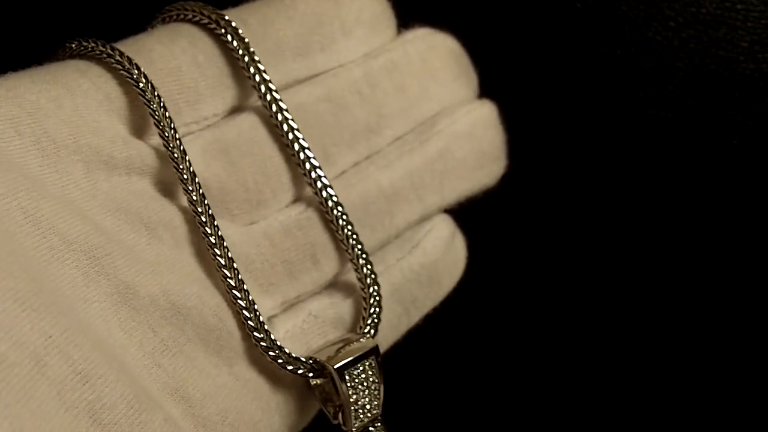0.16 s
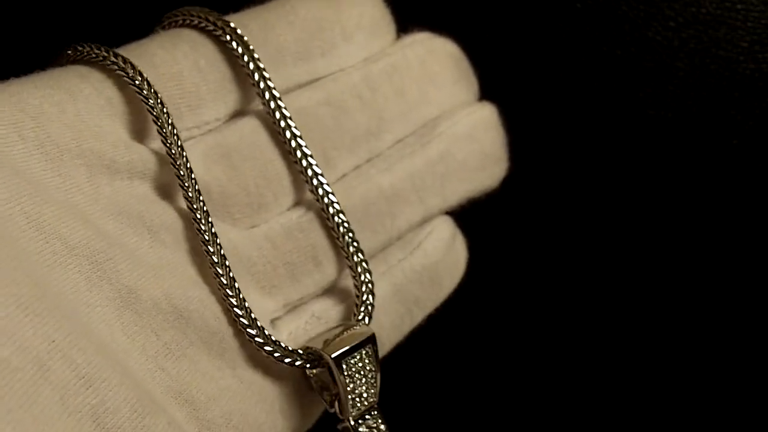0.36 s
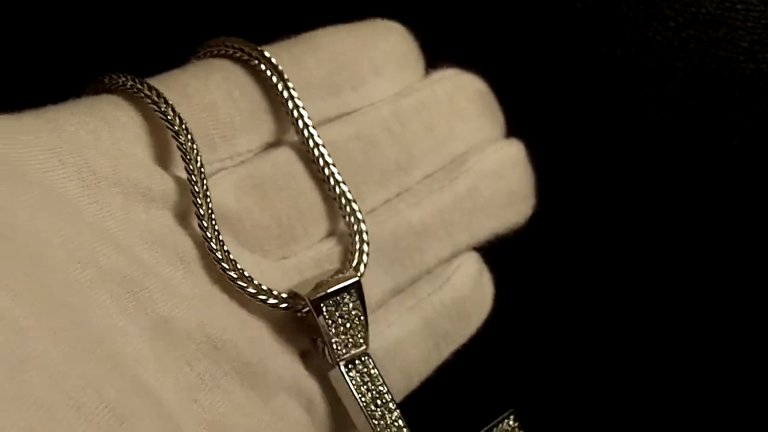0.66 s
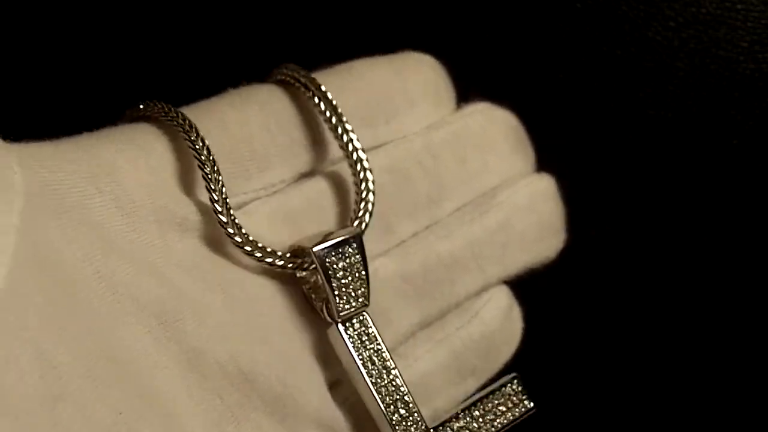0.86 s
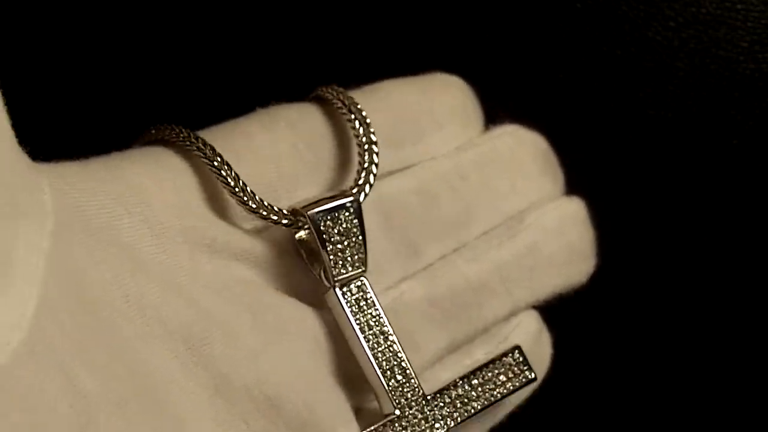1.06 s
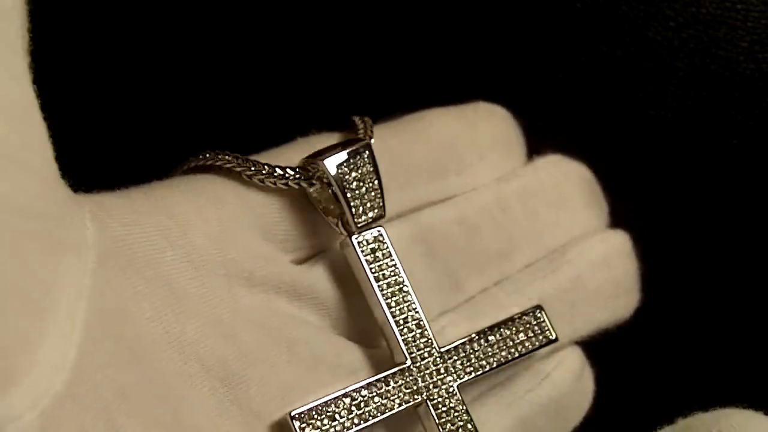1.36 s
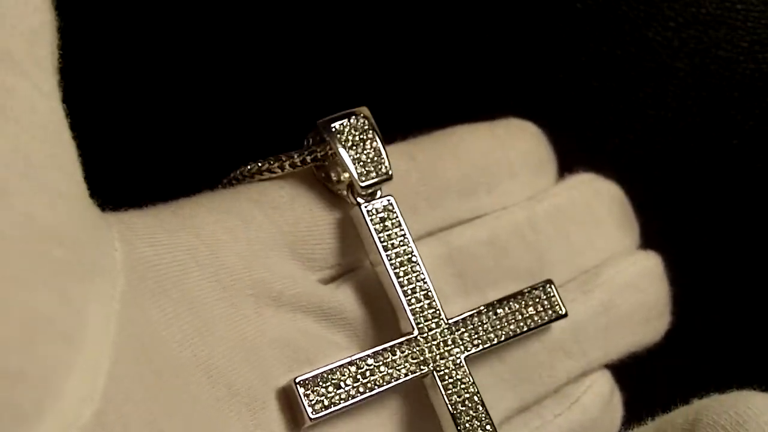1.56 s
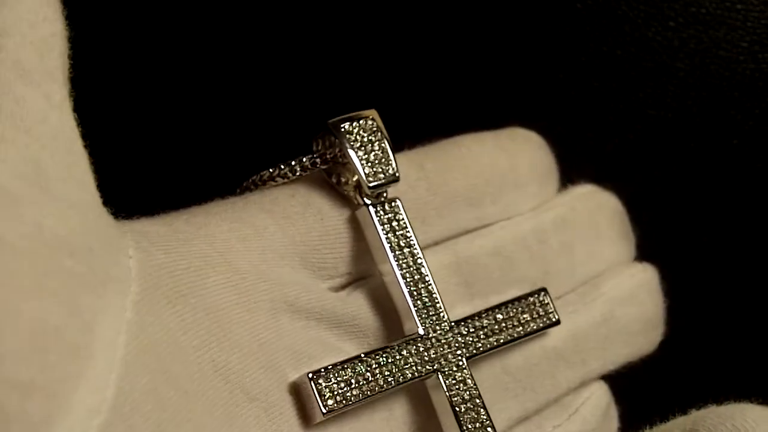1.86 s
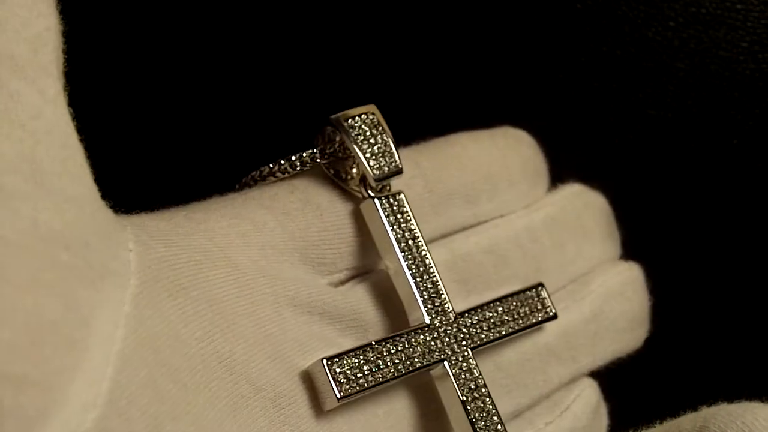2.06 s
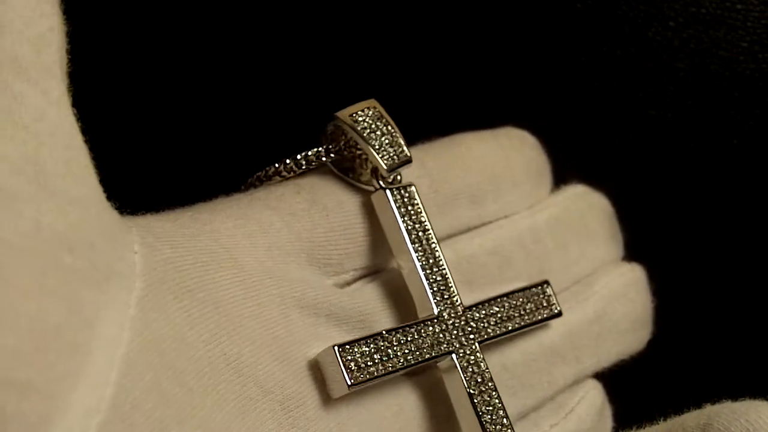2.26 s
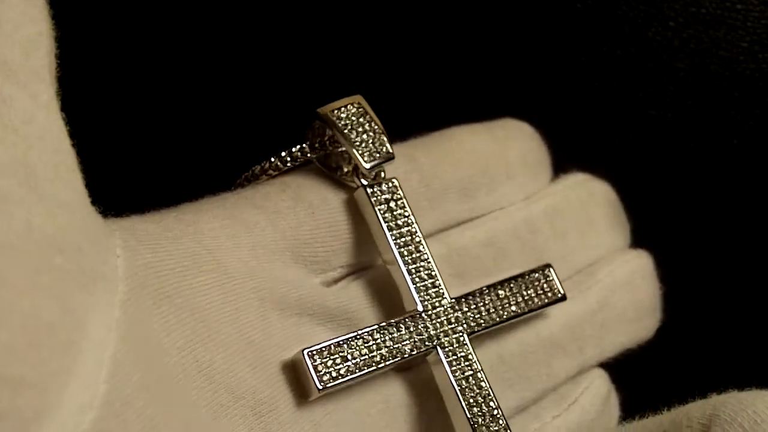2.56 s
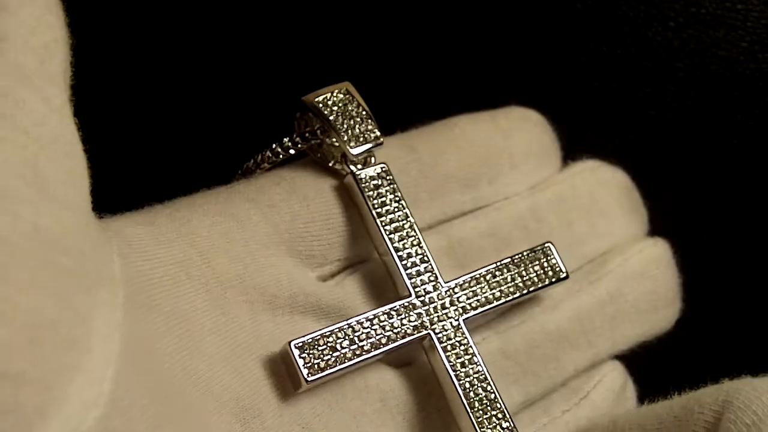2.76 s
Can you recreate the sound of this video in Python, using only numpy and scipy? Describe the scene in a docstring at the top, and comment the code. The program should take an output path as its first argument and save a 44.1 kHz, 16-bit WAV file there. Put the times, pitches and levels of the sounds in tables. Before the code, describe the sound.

Close up, a necklace chain slides through its pendant with a short, delicate metallic jingle. Faint ticks come before and after it, then a last light click, over the low hum and soft hiss of a quiet room.

```python
"""A quiet room with a low hum and a faint pulsing electronic whine; then light touches of metal, up close.
A gloved hand tilts a metal pendant close to the microphone, and its chain slips through the pendant's loop.
Each contact is a cluster of tiny impacts that ring the links and the pendant.
The pendant settles with one last click, and the room tone carries on."""
import sys
import numpy as np
from scipy import signal
from scipy.fft import rfft, irfft
from scipy.io import wavfile
from scipy.ndimage import uniform_filter1d

SR = 44100
rng = np.random.default_rng(int(sys.argv[2]) if len(sys.argv) > 2 else 0)


def transcribe(signal):
    """Save signal, clipped to [-1, 1], as a 16-bit WAV file at the path in sys.argv[1]."""
    frames = np.atleast_2d(signal).T
    limited = np.clip(frames, -1, 1)
    pcm = np.round(limited * 32767).astype(np.int16)
    wavfile.write(sys.argv[1], SR, pcm)


N = 128331
IMPACTS_PER_S = 3200

# colour of a bare impact: f/Hz, level/dB
TICK_COLOUR = [(500, -34), (1200, -23), (1900, -10), (2480, 10.5), (2950, -11), (3700, -20), (4320, 11),
               (5300, -22.5), (6400, 9.5), (8300, 0.5), (9400, -6), (10500, 3), (11300, -19), (15000, -28)]
# modes of the chain's links: f/Hz, level/dB, t60/s
LINK_MODES = [(2420, -16, .01), (2590, -14, .014), (4290, -7, .03), (4520, -14, .015), (6080, -10, .02),
              (6290, -3, .03), (6372, 1, .05), (6530, -3, .025), (6800, -4, .016), (7220, -7, .016),
              (7560, -10, .025), (7850, -7, .016), (8450, -8, .016), (10250, -7, .018), (10670, -6, .03)]
# the pendant's two long rings: f/Hz, level/dB, t60/s
LONG_RINGS = [(7550, 0, .11), (8295, -4, .08)]


def undb(db):
    """Decibels to gain."""
    return 10 ** (np.asarray(db) / 20)


def unit(x):
    """Scale to an rms of 1."""
    return x / np.sqrt(np.mean(x ** 2))


def curve(points, hz):
    """Gain of (f/Hz, level/dB) points on a log-frequency axis."""
    point_hz, point_db = np.array(points, float).T
    return undb(np.interp(np.log(np.maximum(hz, 1)), np.log(point_hz), point_db))


def wander(rate_hz):
    """Smooth random wander with an rms of 1."""
    hold = int(SR / rate_hz)
    steps = np.repeat(rng.standard_normal(N // hold + 1), hold)
    return unit(uniform_filter1d(uniform_filter1d(steps, hold), hold)[:N])


def coloured(x, points, size=512):
    """Pass x through a minimum-phase filter shaped by (f/Hz, level/dB) points."""
    cepstrum = irfft(np.log(curve(points, np.arange(size // 2 + 1) * SR / size)))
    cepstrum[1:size // 2] *= 2
    cepstrum[size // 2 + 1:] = 0
    return signal.fftconvolve(x, irfft(np.exp(rfft(cepstrum))))[:len(x)]


def add(out, start, y):
    """Mix a sound in at its time."""
    i = int(start * SR)
    out[i:i + len(y)] += y[:N - i]


def room_tone(level_db=-43):
    """Steady room rumble and microphone hiss, nearly centred in the bass."""
    # spectrum of rumble and hiss: f/Hz, relative density/dB
    spectrum = [(5, 4.5), (12, 1), (20, 3), (30, 0), (43, -14.5), (80, -14.5), (135, -15.5), (200, -22.5),
                (300, -26.5), (500, -32.5), (900, -38.5), (1600, -44.5), (2800, -49.5), (4700, -55),
                (6500, -55), (7900, -51.5), (9500, -54), (12400, -53.5), (13200, -63), (15000, -61.5)]
    # stereo width: f/Hz, side against mid/dB
    width = [(50, -40), (300, -46.5), (600, -35.5), (1000, -14), (2500, -8.5), (5500, -17), (7500, -12),
             (12000, -4), (14000, -14)]
    hz = np.arange(N // 2 + 1) * SR / N
    mid, side = rfft(rng.standard_normal((2, N))) * unit(curve(spectrum, hz))
    mid, side = irfft(mid, N), irfft(side * curve(width, hz), N)
    return np.array([mid + side, mid - side]) * undb(level_db)


def hum(pitch_hz=58.3, drift=.015, level_db=-46, waver_db=2):
    """The room's low drone: a gently wavering hum, and noise held in a few narrow resonances."""
    # low resonances of the drone: f/Hz, half-width/Hz, level/dB
    resonances = [(61.1, 3.5, -50), (108.7, 5.7, -58), (164.7, 9.3, -64), (236.4, 8.8, -66)]
    cycles = np.cumsum(pitch_hz * (1 + drift * wander(rate_hz=8.87))) / SR + rng.random()
    drone = np.sqrt(2) * np.sin(2 * np.pi * cycles) * undb(level_db + waver_db * wander(rate_hz=8.02))
    hz = np.arange(N // 2 + 1) * SR / N
    for centre, width, db in resonances:
        band = rfft(rng.standard_normal(N)) / (1 + ((hz - centre) / width) ** 2)
        drone += undb(db) * unit(irfft(band, N))
    return drone


def whine(rate_hz=29.97, duty=.48, pulse_centre_s=.0018):
    """Thin electronic tones switch on and off at a steady rate, starting afresh in every cycle."""
    # tones of the whine: f/Hz, level while on/dB
    partials = [(2428, -83), (3062, -78.5), (6125, -78), (6260, -94), (6560, -87), (7850, -86)]
    phase = (rate_hz * (np.arange(N) / SR - pulse_centre_s) + duty / 2) % 1
    tones = sum(np.sin(2 * np.pi * hz * phase / rate_hz) * undb(db) for hz, db in partials)
    return np.sqrt(2) * tones * (phase < duty)


def ring(modes, push, t, detune=.0008, scatter_db=1.5):
    """Metal modes driven by a push; each contact excites them a little differently."""
    out = 0
    for hz, db, t60 in modes:
        pitch_draw, level_draw = rng.standard_normal(2)
        mode = np.sin(2 * np.pi * hz * (1 + detune * pitch_draw) * t) * np.exp(-np.log(1000) * t / t60)
        driven = signal.fftconvolve(push, mode)[:len(t)]
        out = out + unit(driven) * np.sqrt(t60) * undb(db + scatter_db * level_draw)
    return unit(out)


def contact(bodies, length, low_db, top_db, tick_db, size=8192):
    """Tiny impacts in quick succession tick and ring the bodies, given as (modes, dB), then die away."""
    settle_db, settle_s, scatter_db = -13, .004, 3
    t = np.arange(size) / SR
    hits = rng.random(size) < IMPACTS_PER_S / SR
    hits[0] = True
    force = np.where(t <= length, 1, undb(settle_db) * np.exp(-np.abs(t - length) / settle_s))
    push = hits * force * undb(scatter_db * rng.standard_normal(size)) * rng.choice([-1, 1], size)
    tick = unit(coloured(push, TICK_COLOUR))
    metal = unit(sum(undb(db) * ring(modes, push, t) for modes, db in bodies))
    shelves = [(4800, low_db), (6000, 0), (8400, 0), (10200, top_db)]
    sound = coloured(metal + undb(tick_db) * tick, shelves)
    power = uniform_filter1d(sound ** 2, size=176, mode="constant")
    return sound / np.sqrt(power.max())  # rms 1 over the loudest 4 ms


def light_touches(out, link_t60=.0035):
    """Links stir against the pendant before and after the slip."""
    # touches: t/s, level/dB, length/s, struck link f/Hz, long rings/dB, low shelf/dB
    touches = [(.1745, -61, .0012, 7600, -4, 8), (0.3357, -59, 0.0036, 3500, -7, 4),
               (.3915, -67, 0.0034, 7700, -5, 2), (0.504, -60.5, 0.0028, 8200, 5, 0.5),
               (0.511, -64, 0.0067, 6700, -7, 5), (0.577, -62, 0.0053, 8350, -1, 5),
               (0.591, -61.5, .0035, 8000, 0, 5), (1.074, -57.5, .003, 7650, 4, -2),
               (1.152, -62, 0.0042, 6950, -18, 1), (1.291, -64.5, 0.0033, 4400, -4, -5)]
    for start, db, length, link_hz, long_db, low_db in touches:
        bodies = [([(link_hz, 0, link_t60)], 0), (LONG_RINGS, long_db)]
        add(out, start, undb(db) * contact(bodies, length, low_db, top_db=0, tick_db=-3))


def chain_rattle(out, link_db=-4, link_t60=.008):
    """The chain slips through the loop, striking link after link."""
    # contacts: t/s, level/dB, length/s, struck link f/Hz, low shelf/dB, top shelf/dB
    contacts = [(.620, -61, .004, 7740, 9, -3), (.632, -59.5, .006, 7860, 0, 3),
                (0.652, -57, .005, 8100, 3, -12), (.676, -48, 0.0041, 8400, 4, 7),
                (.687, -60, .004, 8400, 2, 9), (.6935, -54, 0.0017, 8000, -10, 5),
                (.704, -59, 0.0032, 7250, -3, 0), (0.72, -56, .001, 7800, -2, 2),
                (.7375, -67, 0.0023, 7500, 0, 3), (.747, -46.5, 0.0011, 7750, -6.5, 1),
                (0.764, -50.5, .0045, 8300, -1, 5), (.769, -51, 0.0022, 7750, 3, -1),
                (.785, -46, .0075, 6800, -10, -5), (.799, -53.5, 0.0054, 7660, 1, -7),
                (.812, -52, 0.0074, 6730, 0, 0), (.830, -48.5, 0.0073, 6660, 0, 6),
                (.841, -56, 0.0045, 6450, 5, 8), (0.8589, -55, 0.0045, 6650, -3, -3),
                (.862, -48.5, 0.0038, 6840, -9, 0), (.869, -55, 0.0024, 6600, -2, 4),
                (.882, -61, 0.0042, 6500, 3, 2), (.9075, -62, .001, 6900, 2, 0),
                (0.9116, -50, 0.0069, 6750, 1, 8.5), (.934, -61, 0.0025, 9400, 3, -4),
                (.947, -53.5, .003, 6800, 0, 1)]
    damping, light_touch_db = .45, -60
    for start, db, length, link_hz, low_db, top_db in contacts:
        # hard contacts press the pendant against the glove and weaken its long rings
        long_db = -6 - damping * (db - light_touch_db)
        bodies = [(LINK_MODES, 0), ([(link_hz, 0, link_t60)], link_db), (LONG_RINGS, long_db)]
        add(out, start, undb(db) * contact(bodies, length, low_db, top_db, tick_db=-4.5))


def chain_slide(tick_db=-5.5):
    """A fine steady stream of impacts ticks and rings the links as they run through the loop."""
    # swell of the sliding between contacts: t/s, level/dB
    swell = [(.645, -75), (.68, -59.5), (.735, -68), (.79, -58.5), (.87, -59.5), (.90, -72), (.97, -74)]
    times, db = np.array(swell).T
    t = np.arange(N) / SR
    push = (rng.random(N) < IMPACTS_PER_S / SR) * rng.standard_normal(N)
    link_response = ring(LINK_MODES, np.ones(1), t[:SR // 4])
    links = unit(signal.fftconvolve(push, link_response)[:N])
    ticks = unit(coloured(push, TICK_COLOUR))
    return unit(links + undb(tick_db) * ticks) * np.interp(t, times, undb(db), left=0, right=0)


def pendant_clinks(out):
    """The pendant strikes its loop twice as the slip begins."""
    # modes of the pendant: f/Hz, level/dB, t60/s
    pendant_modes = [(2130, -7, .02), (2310, -6, .02), (2520, -6, .025), (3980, -15, .015),
                     (4310, -9, .035), (4860, -10, .035), (5975, 1, .045), (6350, -2, .025),
                     (6820, -8, .02), (7260, -8, .025), (7580, -4, .05), (8110, -7, .03), (8310, -5, .055),
                     (8510, 1, .03), (8900, -5, .025), (10100, -8, .02), (10495, 1, .04), (10680, 1, .03)]
    # strikes: t/s, level/dB, length/s, low shelf/dB, top shelf/dB
    clinks = [(.659, -41, 0.0025, -0.5, 0), (.663, -38, .0045, -2.5, -1.5)]
    for start, db, length, low_db, top_db in clinks:
        add(out, start, undb(db) * contact([(pendant_modes, 0)], length, low_db, top_db, tick_db=-9))


def settling_click(out):
    """The pendant drops against its loop and rebounds, so quickly that one click is heard."""
    # modes of the loop: f/Hz, level/dB, t60/s
    loop_modes = [(2550, -15, .012), (4450, -16, .018), (4820, -7, .013), (6080, -8, .018),
                  (6950, -5, .012), (7280, 1, .018), (8260, -11, .055), (10230, 0, .018), (10420, 0, .03),
                  (10650, -2, .032)]
    # drop and rebound: t/s, level/dB, length/s, low shelf/dB, top shelf/dB
    clicks = [(1.3031, -48.5, .003, -8, -1.5), (1.3076, -51, .0033, -1, -6)]
    for start, db, length, low_db, top_db in clicks:
        add(out, start, undb(db) * contact([(loop_modes, 0)], length, low_db, top_db, tick_db=-34))


def jewellery():
    """Chain and pendant at close range, their highest treble softened."""
    # treble colour of the jewellery: f/Hz, gain/dB
    treble_colour = [(4950, -1), (5400, 0), (5850, -0.5), (10750, 0.5), (11150, -18), (13000, -10.5),
                     (15000, -4)]
    metal = chain_slide()
    light_touches(metal)
    pendant_clinks(metal)
    chain_rattle(metal)
    settling_click(metal)
    return coloured(metal, treble_colour)


def room_tail(x, level_db=-26.5, t60=.16):
    """The room answers with a faint short tail, different in each channel."""
    t = np.arange(SR // 2) / SR
    tails = rng.standard_normal((2, len(t))) * np.exp(-np.log(1000) * t / t60)
    tails = tails + tails.mean(axis=0)  # partly shared between left and right
    return undb(level_db) * np.array([signal.fftconvolve(x, h / np.linalg.norm(h))[:N] for h in tails])


def scene(left_over_right_db=.1):
    """Jewellery close to the microphone and centred, with the quiet room behind it."""
    background = room_tone() + hum() + whine()
    metal = jewellery()
    balance = undb(np.array([[left_over_right_db], [-left_over_right_db]]) / 2)
    return (background + metal + room_tail(metal)) * balance


def record(dry):
    """The recorder has a narrow notch in the treble, cuts the top and sits slightly off zero."""
    notch_hz, notch_width_hz, notch_db = 5400, 270, -13
    top_hz, dc_left, dc_right = 15000, .046, .038
    hz = np.arange(N // 2 + 1) * SR / N
    notch = undb(notch_db * np.exp(-((hz - notch_hz) / notch_width_hz) ** 2))
    notched = irfft(rfft(dry) * notch, N)
    lowpass = signal.ellip(8, .2, 70, top_hz, fs=SR, output="sos")
    return signal.sosfilt(lowpass, notched) + np.array([[dc_left], [dc_right]])


dry = scene()
out = record(dry)
transcribe(out)
```